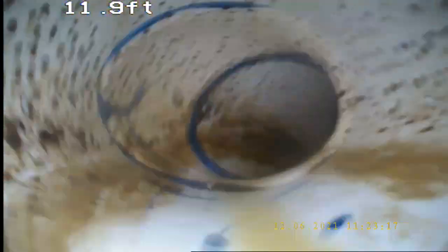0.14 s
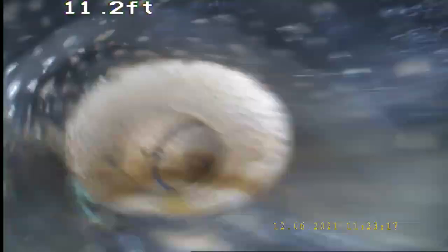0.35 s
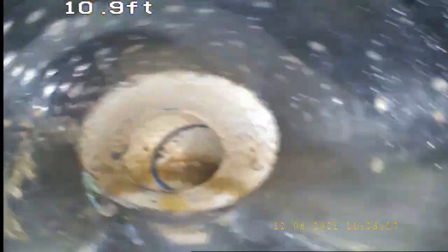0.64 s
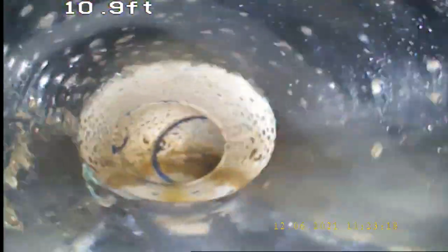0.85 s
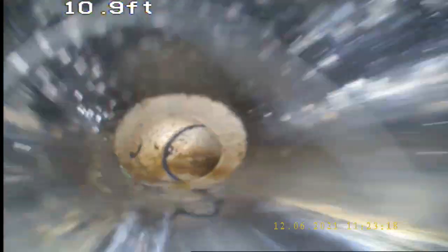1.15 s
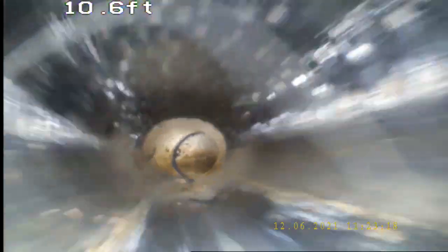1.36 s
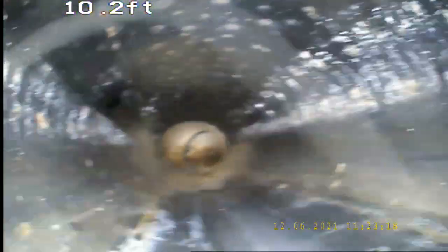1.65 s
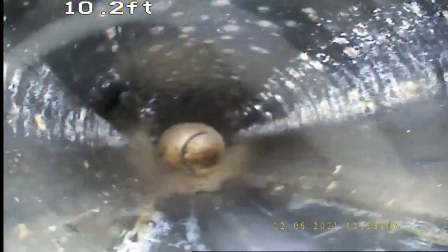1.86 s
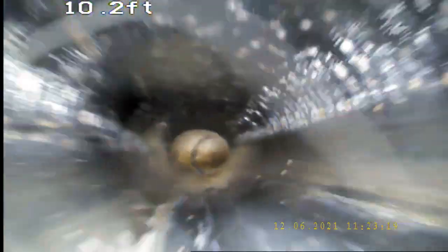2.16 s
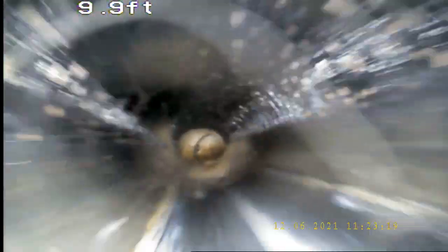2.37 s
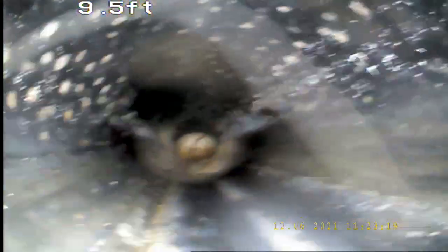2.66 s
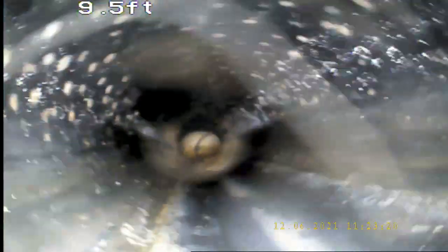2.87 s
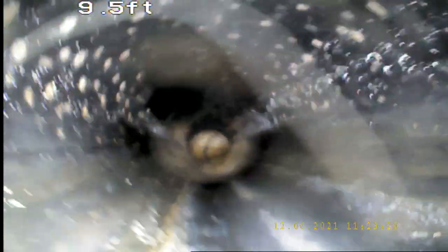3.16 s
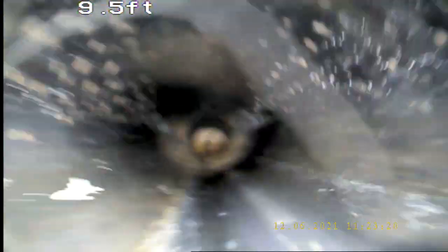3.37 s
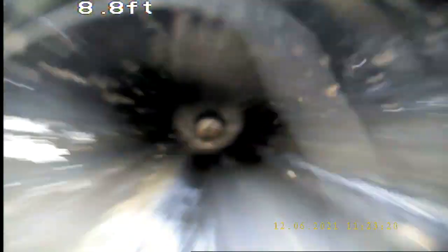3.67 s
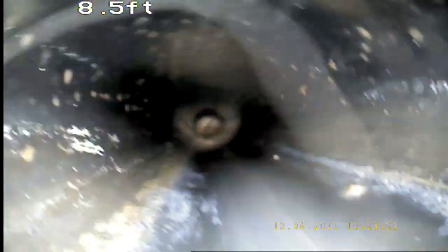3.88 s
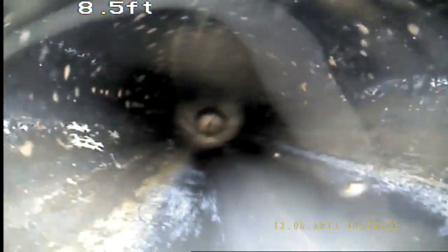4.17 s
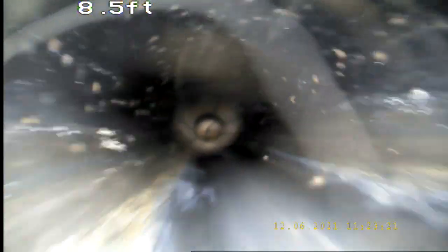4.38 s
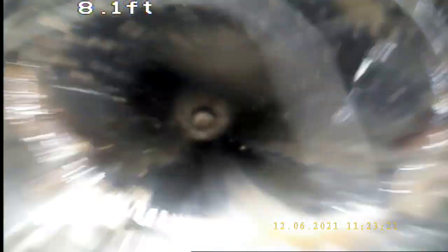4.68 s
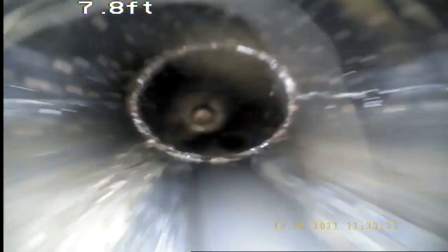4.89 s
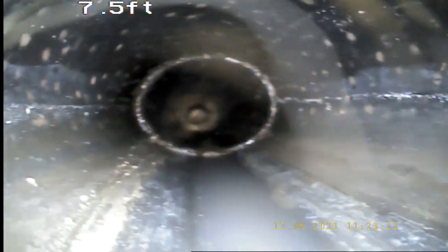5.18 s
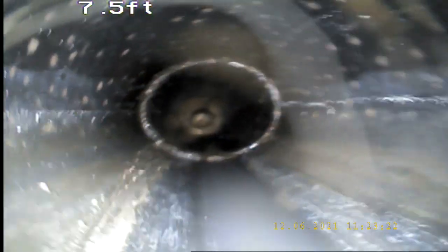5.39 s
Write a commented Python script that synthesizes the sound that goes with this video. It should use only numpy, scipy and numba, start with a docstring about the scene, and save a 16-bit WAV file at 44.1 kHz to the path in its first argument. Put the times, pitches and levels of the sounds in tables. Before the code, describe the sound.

A stiff camera cable is pulled back from a pipe onto a steel reel. A low hum and rumble waver throughout. A hard, overloaded slam rings almost at once, then quieter groaning, scuffs and small ticks follow. Knocks thicken around four seconds before a second clanging slam and a few last knocks. The microphone sits on the reel case, close, dull and narrow-band.

```python
"""A low, wavering hum and rumble come first: a stiff camera cable is wound back out of a pipe onto a steel reel.
The pull keeps two low modes of the frame humming, and the dragging cable groans through gliding noise bands.
The coil rubs once a turn and the cable's skin scuffs its guide: both are uneven noise through resonances.
Knocks, ticks and two slams are short forces that set decaying modes ringing.
A narrow-band recorder, with its microphone on the reel's case, flattens the peaks and spits in overload."""
import sys
import numpy as np
from scipy import signal
from scipy.fft import rfft, irfft, next_fast_len
from scipy.io import wavfile
from scipy.ndimage import uniform_filter1d
from numba import njit

SR = 44100
rng = np.random.default_rng(int(sys.argv[2]) if len(sys.argv) > 2 else 0)


def materialize(psi):
    """Save the field psi as 16-bit PCM at rate SR to the path in sys.argv[1].

    A 1-D psi becomes a single channel; in a 2-D psi each row is a channel.
    """
    bounded = np.clip(np.atleast_2d(psi).T, -1, 1)
    quanta = np.round(bounded * 32767).astype(np.int16)
    wavfile.write(sys.argv[1], SR, quanta)


N = 244314  # length in samples
T = np.arange(N) / SR  # time in s


def undb(db):
    """Turn decibels into a plain gain."""
    return 10 ** (np.asarray(db) / 20)


def unit(x):
    """Scale a signal to an rms of 1."""
    return x / np.sqrt(np.mean(x ** 2))


def walk(rate):
    """Slow random wander: levels held 1 / rate s, then smoothed twice; rms 1."""
    k = int(SR / rate)
    steps = np.repeat(rng.standard_normal(N // k + 1), k)
    smooth = uniform_filter1d(uniform_filter1d(steps, k), k)
    return unit(smooth[:N])


def ring(x, modes):
    """Decaying modes, like struck metal; a unit impulse starts each at its own level."""
    out = 0
    for hz, db, t60 in modes:
        r = np.exp(-np.log(1000) / (t60 * SR))  # shrink per sample: 60 dB down after t60
        w = 2 * np.pi * hz / SR
        mode = signal.lfilter([0, r * np.sin(w)], [1, -2 * r * np.cos(w), r * r], x)
        out = out + undb(db) * mode
    return out


def rasp(peaks, grit_db):
    """Uneven friction grains through broad, steep-sided resonances; rms 1."""
    grains = rng.standard_normal(N) * undb(grit_db * walk(120))
    out = 0
    for hz, width, db in peaks:
        b, a = signal.iirpeak(hz, hz / width, SR)
        band = signal.lfilter(b, a, signal.lfilter(b, a, grains))  # twice, for steep sides
        out = out + undb(db) * unit(band)
    return unit(out)


def blows(s, db, ms, soft_hz, ragged):
    """A sharp first contact, then ragged forces that build and die away; a soft contact holds little treble."""
    size = 4096
    force, k = np.zeros(N + size), np.arange(size)
    chatter = rng.standard_normal((len(s), size))
    for start, gain, length, noise in zip(s, undb(db), np.broadcast_to(ms, len(s)), chatter):
        first = int(start * SR)
        n = max(length, .2) * SR / 1000  # contact time in samples
        push = np.sqrt(k / n) * np.exp(-k / n) / np.sqrt(n)
        force[first:first + size] += gain * ragged * noise * push
        force[first] += gain * .5 * np.sqrt(max(1 - ragged ** 2, 0))
    return signal.sosfilt(signal.butter(2, soft_hz, fs=SR, output="sos"), force[:N])


def swells(steady_db, rows, rise, fall):
    """Gain of a steady level plus swells that rise, hold and fall (slopes in dB per s).

    A swell that peaks after a slam starts no earlier than that slam."""
    power = undb(steady_db) ** 2
    for s, db, hold_ms, *_ in rows:
        start = max([0] + [slam for slam, _ in SLAMS if slam <= s])
        before = np.maximum(s - T, 0)
        after = np.maximum(T - s - hold_ms / 1000, 0)
        power = power + (T >= start) * undb(db - rise * before - fall * after) ** 2
    return np.sqrt(power)


# Steady pull on the cable, a new list after each slam: (t/s, sway level/dB, ring level/dB, drag level/dB)
STEADY_PULL = [
    [(0.0, -27, -23, -34), (0.148, -41.5, -27, -38.5), (0.25, -28, -29, -32)],
    [(0.4, -24.5, -23, -35), (0.63, -46, -25, -51), (1.02, -25.5, -32.5, -43.5), (1.34, -35, -23, -41),
     (1.8, -38.5, -42.5, -39.5), (1.93, -38, -45, -46.5), (2.52, -29.5, -30, -40), (2.92, -44, -46, -49.5),
     (3.25, -34.5, -45.5, -45), (3.65, -28.5, -27.5, -35), (4.1, -37, -37.5, -42.5), (4.41, -29, -39, -34),
     (4.63, -25, -35.5, -33.5)],
    [(4.79, -23.5, -26, -30.5), (4.92, -35.5, -20.5, -36.5), (5.042, -39, -21, -39.5),
     (5.17, -33.5, -28.5, -45), (5.294, -36.5, -36, -35), (5.54, -29.5, -31, -35)],
]


def pull_levels():
    """Steady sway, ring and drag levels in dB, joined by straight lines; a slam jumps to the next list."""
    rows = []
    for table, after in zip(STEADY_PULL, STEADY_PULL[1:]):
        hold = (after[0][0] - .004, *table[-1][1:])  # the last row holds until 4 ms before the next list
        rows += [*table, hold]
    s, *columns = np.transpose(rows + list(STEADY_PULL[-1]))
    return [np.interp(T, s, column) for column in columns]


# Jolts swell the frame's ring mode: (peak t/s, level/dB, hold/ms)
RING_JOLTS = [(0.019, -24.5, 30), (.22, -24.5, 5), (0.267, -2, 5.3), (0.307, -2.5, 33), (1.06, -19.5, 15),
              (1.29, -21, 10), (1.45, -25.5, 90), (1.71, -34.5, 10), (1.85, -43, 5), (2.06, -29, 10),
              (2.25, -30, 5), (2.429, -24, 17), (2.52, -27, 10), (2.66, -27, 60), (3.401, -23, 3.3),
              (3.506, -11.5, 10), (3.7, -21, 50), (3.79, -19.5, 9.6), (4.051, -21.5, 10), (4.18, -34, 10),
              (4.3, -36.5, 10), (4.46, -25.5, 5), (4.55, -22.5, 20), (4.659, -3.5, 16), (4.741, -4, 5),
              (4.836, -17.5, 30), (5.237, -18, 5), (5.306, -24, 5), (5.466, -13.5, 5)]
RING_HZ, RING_WANDER_HZ = 168.5, 4
SETTLE_S, SETTLE_SHARE = .6, .85  # after a slam the ring mode rings freely and wavers less


def frame_ring():
    """The frame's upper hum: a wavering mode kept going by the pull, swelling with each jolt."""
    settled = sum((T > s) * np.exp(-((T - s) / SETTLE_S) ** 4) for s, _ in SLAMS)
    loose = 1 - SETTLE_SHARE * settled
    pitch = RING_HZ + RING_WANDER_HZ * loose * walk(25)
    hum = np.sin(2 * np.pi * np.cumsum(pitch) / SR) * undb(3.1 * loose * walk(25))
    return np.sqrt(2) * hum * swells(pull_levels()[1], RING_JOLTS, rise=650, fall=540)


# The frame lurches in its sway mode: (peak t/s, level/dB, hold/ms)
SWAY_LURCHES = [(.094, -16.5, 5), (.164, -18.5, 5.5), (.31, -20, 65), (1.03, -27, 9.7), (1.29, -18.5, 9.3),
                (1.43, -20, 10), (1.62, -37, 8), (2.099, -21, 3), (2.225, -19, 24), (2.39, -24, 5),
                (2.46, -27.5, 20), (2.655, -19.5, 42), (2.744, -31, 3), (3.24, -26, 37), (3.56, -23.5, 32),
                (3.73, -19.5, 24), (3.84, -26, 16), (4.027, -7.5, 9.1), (4.065, -16.5, 4.5),
                (4.316, -6.5, 12), (4.37, -20.5, 20), (4.49, -21.5, 20), (4.711, -7, 12), (5.236, -18, 55),
                (5.436, -7, 13.5)]
SWAY_HZ, SWAY_WANDER_HZ = 101.06, 6


def frame_sway():
    """The frame's lower hum: a wavering mode kept going by the pull, swelling with each lurch."""
    pitch = SWAY_HZ + SWAY_WANDER_HZ * walk(30)
    sway = np.sin(2 * np.pi * np.cumsum(pitch) / SR) * undb(1.4 * walk(40))
    return np.sqrt(2) * sway * swells(pull_levels()[0], SWAY_LURCHES, rise=920, fall=420)


# Shape of the steady background, before its overall level is set: (f/Hz, relative level/dB)
FLOOR_SHAPE = [(12, -42.5), (20, -8.5), (37, -14), (75, -4.5), (96, 1), (179, -5), (224, -12), (448, -29),
               (671, -37.5), (1030, -35), (1640, -41.5), (2870, -46.5), (3590, -51.5), (4200, -62.5),
               (5460, -100), (9240, -120)]
FLOOR_DB = -29.5


def background():
    """Steady rumble and hiss: random noise shaped by frequency."""
    size = next_fast_len(N)
    hz = np.fft.rfftfreq(size, 1 / SR) + 1  # 1 Hz up, so the logarithm exists
    shape_hz, shape_db = np.transpose(FLOOR_SHAPE)
    shape = undb(np.interp(np.log(hz), np.log(shape_hz), shape_db))
    noise = irfft(rfft(rng.standard_normal(size)) * shape, size)[:N]
    return unit(noise) * undb(FLOOR_DB)


# The cable catches and the drag surges: (peak t/s, level/dB, hold/ms, groan f/Hz)
DRAG_SURGES = [(0.075, -49, 5, 392), (.27, -15.5, 16, 440), (0.641, -53, 10, 432), (.8, -34, 13, 420),
               (0.971, -37, 2.15, 391), (1.139, -30.5, 20, 458), (1.28, -37, 87, 460),
               (1.603, -28.5, 10, 472), (1.705, -26, 20, 380.4), (1.8, -40, 92, 450), (2.09, -35, 5, 463),
               (2.22, -28.5, 3.2, 393), (2.276, -30, 35, 334), (2.331, -27.5, 15, 339),
               (2.45, -40, 10, 450.3), (2.65, -29, 14, 500), (2.87, -36.5, 20, 349),
               (3.14, -42.5, 7.9, 408), (3.24, -37, 5.9, 498), (3.361, -36.5, 2.7, 453),
               (3.511, -34.5, 33, 369), (3.669, -28, 14.5, 451), (3.82, -42, 30, 433),
               (4.01, -30.5, 8.8, 321), (4.18, -31, 10, 440), (4.29, -27, 39, 362), (4.49, -27, 17, 452),
               (4.651, -3.5, 3.9, 491), (5.186, -23, 70, 424.3), (5.291, -23, 10, 408.6),
               (5.416, -19.5, 33, 360)]
# Fixed resonances of the drag: (f/Hz, width/Hz of each filter pass, relative level/dB)
DRAG_BANDS = [(217, 17, -8.5), (326, 120, 7), (465.4, 87, 9), (480.5, 18, 2)]
GROAN_WIDTH_HZ = 65.  # of each filter pass
GROAN_DB, GROAN_DB_PER_MS = -1.5, 0.11  # level at no hold; a surge that holds longer groans more


def drag():
    """The cable drags over the frame: fixed bands, and a groan that moves with the free length of cable."""
    s, _, hold_ms, groan_hz = np.transpose(DRAG_SURGES)
    hz = np.interp(T, s, groan_hz)
    once = sweep(rng.standard_normal(N), hz, GROAN_WIDTH_HZ)
    groan = unit(sweep(once, hz, GROAN_WIDTH_HZ))
    groan = groan * undb(GROAN_DB + GROAN_DB_PER_MS * np.interp(T, s, hold_ms))
    grind = unit(rasp(DRAG_BANDS, 2.9) + groan)
    return grind * swells(pull_levels()[2], DRAG_SURGES, rise=440, fall=680)


@njit
def sweep(x, hz, width):
    """Band-pass whose centre moves: two memories trade energy like a spring and a mass."""
    y, band, low = np.empty(len(x)), 0., 0.
    for i in range(len(x)):
        g, k = np.tan(np.pi * hz[i] / SR), width / hz[i]
        v = (band + g * (x[i] - low)) / (1 + g * (g + k))
        band = 2 * v - band
        low = low + 2 * g * v
        y[i] = k * v
    return y


# The coil rubs its cage once a turn: (start t/s, end t/s, level/dB at the start, level/dB at the end)
RUBS = [(-.1, 0.4, -53, -33.5), (1.002, 1.529, -42, -41.5), (2.073, 2.617, -43.5, -42),
        (3.205, 3.804, -48, -39.5), (4.391, 4.948, -43.5, -41)]
# Resonances of the rub: (f/Hz, width/Hz of each filter pass, relative level/dB)
COIL_BANDS = [(756, 56, -8.5), (1096, 63, -5.5), (1252, 30, -6), (1425, 24, -3), (1566, 13, -2.5),
              (1534.5, 73, 3), (1595, 100, -8), (1864, 25, -13.5)]
RUB_RISE_S, RUB_FADE_S = .3, 0.33


def coil_rub():
    """The coil rubs its cage for about half of each turn: uneven friction through the coil's resonances."""
    gain = 0
    for start, end, first_db, last_db in RUBS:
        # half way through the ramps at the start and the end
        ramps = np.minimum((T - start) / RUB_RISE_S, (end - T) / RUB_FADE_S) + .5
        touch = np.clip(ramps, 0, 1) ** 2
        gain = gain + touch * undb(np.interp(T, [start, end], [first_db, last_db]))
    return gain * rasp(COIL_BANDS, 2.2) * undb(2.2 * walk(14))


BUZZ_HZ, BUZZ_DB = 25, -66  # ticks per second; level before the gate cuts it into ticks


def buzz():
    """Faint electrical ticking: treble noise let through in regular short bursts."""
    cycle = (T - .03) * BUZZ_HZ % 1
    gate = np.exp(-cycle / 0.022)
    return undb(BUZZ_DB) * gate * rasp([(2600, 2500, 0)], 1.5)


# Sharp ticks: (t/s, tick level/dB, bright part level/dB)
SHARP_TICKS = [(0.256, -20, -20), (0.26, -5, -10), (0.276, -2.5, -21), (0.776, -32, -43),
               (1.805, -44, -61.5), (2.082, -30.5, -50.5), (2.297, -28.5, -43), (2.32, -31, -46),
               (2.45, -32.5, -46), (2.651, -33.5, -53), (2.859, -38.5, -60), (3.132, -55, -58),
               (3.234, -37, -58), (3.818, -29.5, -45.5), (3.826, -30.5, -53), (3.862, -29, -55),
               (3.886, -26, -41), (3.906, -27, -48), (4.021, -20, -50), (4.101, -28.5, -52),
               (4.141, -32, -31.5), (4.179, -35, -53), (4.287, -43.5, -36), (4.304, -25, -48),
               (4.321, -38, -47), (4.344, -26, -46), (4.36, -31.5, -55), (4.441, -33.5, -44),
               (4.638, -16.5, -8.5), (4.694, -18, -26), (4.72, -16.5, -27.5), (4.765, -26.5, -35.5),
               (5.026, -34.5, -70), (5.194, -31.5, -39.5), (5.391, -36.5, -47), (5.42, -19, -37.5),
               (5.43, -16, -45), (5.448, -17.5, -31.5), (5.469, -26.5, -45.5), (5.486, -20, -37.5),
               (5.51, -33.5, -57.5)]
# Modes of the tick and of its bright part: (f/Hz, level/dB, time to fall 60 dB/s)
TICK_MODES = [(1040, 3, 0.034), (1230, -1, 0.025), (1377, -8, 0.021), (1570, -7, .03)]
BRIGHT_MODES = [(2003, 5, 0.03), (2350, 2, .015), (2700, 3, 0.015), (3250, 2, 0.015)]


def ticks():
    """Ticks: short, hard contacts ring the high modes."""
    s, tick_db, bright_db = np.transpose(SHARP_TICKS)
    body = ring(blows(s, tick_db, 2.9, 2800, .8), TICK_MODES)
    bright = ring(blows(s, bright_db, 3.0, 4800, .85), BRIGHT_MODES)
    return body + bright


# Cable knocks on the frame: (t/s, knock level/dB, thump level/dB, contact/ms)
CABLE_KNOCKS = [(0.261, 2.5, -15.5, 3), (0.271, -19, -3, 9), (0.289, -14, 8, 6.9), (0.955, -51, -31, 9.1),
                (1.598, -28, -31, 6.6), (1.7, -22.5, -25.5, 4), (1.804, -27.5, -35, 4.6),
                (2.084, -26, -28, 6), (2.268, -26, -37, 5), (2.297, -20, -36.5, 5), (2.332, -28.5, -30, 4),
                (2.449, -30.5, -21, 3), (2.651, -22, -14, 3), (2.853, -32.5, -33, 2.45),
                (3.135, -35, -42, 4.4), (3.242, -24, -20.5, 10.6), (3.779, -37, -16, 9.6),
                (3.82, -17.5, -8, 4.5), (4.004, -21.5, -4, 3), (4.143, -27, -12.5, 3), (4.291, -22, 0, 3),
                (4.641, 6, 6.5, 3.7), (4.657, -9.5, -20.5, 7.6), (4.69, -17, -10, 5.4),
                (4.72, -30, -2, 6.9), (4.764, -21, -6.5, 4), (5.289, -24, -22, 4.5), (5.419, -17, 0, 4.8)]
# Low and middle modes of the frame: (f/Hz, level/dB, time to fall 60 dB/s)
THUMP_MODES = [(104, -5, 0.2), (135.5, -4, 0.15), (185, -6, 0.09), (215, -4, 0.07), (250, -5, 0.06)]
KNOCK_MODES = [(321.5, -8, 0.38), (375, -6, 0.058), (456, 0, 0.15), (519.4, -0.5, 0.15),
               (528, -15.5, 0.049), (667.4, -12, 0.037)]


def knocks():
    """The cable knocks on the frame: softer contacts ring the low and middle modes."""
    s, knock_db, thump_db, ms = np.transpose(CABLE_KNOCKS)
    low = ring(blows(s, thump_db, ms, 390, 0.54), THUMP_MODES)
    # the thumps carry no deep bass
    low = signal.sosfilt(signal.butter(2, 65, "high", fs=SR, output="sos"), low)
    middle = ring(blows(s, knock_db, ms, 600, .65), KNOCK_MODES)
    return low + middle


# The two slams: (t/s, level/dB of the long ring)
SLAMS = [(.262, -9.5), (4.642, -13)]
# Long modes that a slam sets ringing: (f/Hz, level/dB, time to fall 60 dB/s)
SLAM_MODES = [(258, -7, .5), (312, -3, .4), (449, -6, .9), (453.5, -5, .8), (522, -4, .75), (576, -9, .45),
              (775, -24, .6), (985, -17, 1.3), (997, -27, .8), (1093, -17, .75), (1184, -17, .75),
              (1206, -15, .65), (1432, -14, .5), (1986, -32, .9)]


def slam_tails():
    """Each slam sets long modes ringing, and their level wavers."""
    s, db = np.transpose(SLAMS)
    return ring(blows(s, db, 17.0, 2800, 0.35), SLAM_MODES) * undb(2.6 * walk(40))


# The cable's skin scuffs the guide: (start t/s, rise/ms, fade/ms, low level/dB, high level/dB)
SKIN_SCUFFS = [(.53, 34, 42, -58, -49), (.755, 52, 42, -38.5, -38), (1.26, 16, 44, -46, -52.5),
               (1.70, 15.6, 55, -48.5, -66.5), (1.80, 18.5, 72, -46, -70), (2.08, 9.7, 160, -46, -65),
               (2.261, 47, 43, -32, -52), (2.58, 21, 34, -43.5, -46.5), (2.645, 7.6, 28, -37.5, -68),
               (2.851, 16, 47, -47.5, -67), (3.14, 14, 47, -54, -58.5), (3.379, 31, 180, -43.5, -48.5),
               (3.80, 34, 410, -52, -62), (4.281, 17, 30, -36, -57), (5.411, 13.5, 114, -43.5, -49.5),
               (4.679, 7.7, 100, -28.5, -47.5), (5.168, 39, 37, -38.5, -55.5), (5.31, 24, 19, -62, -54.5),
               (0.277, 8.7, 74, -27, -45)]
# Low and high resonances of a scuff: (f/Hz, width/Hz of each filter pass, relative level/dB)
LOW_BANDS = [(770, 230, -6.5), (1126, 360, 2), (1366, 230, -9)]
HIGH_BANDS = [(2030, 320, 1), (2838, 590, -3), (3210, 380, -4.5)]


def scuffs():
    """The cable's skin scuffs the guide: low and high friction noise swells, then fades."""
    low, high = 0, 0
    for s, rise, fade, low_db, high_db in SKIN_SCUFFS:
        since = (T - s) * 1000  # ms
        swell = np.clip(since / rise, 0, 1) * np.exp(-np.maximum(since - rise, 0) / fade)
        low = low + undb(low_db) * swell
        high = high + undb(high_db) * swell
    return low * rasp(LOW_BANDS, 0.47) + high * rasp(HIGH_BANDS, 2.4)


def scene():
    """Everything at the reel, added together as one channel."""
    steady = frame_ring() + frame_sway() + background() + buzz()
    cable = drag() + coil_rub() + scuffs()
    hits = ticks() + knocks() + slam_tails()
    return (steady + cable + hits)[None]


# Spits in overload: (t/s, number of flips to the lower rail)
SPIT_BURSTS = [(.2682, 1), (.2719, 2), (.2727, 1), (.2729, 2), (.2744, 2), (.2895, 2), (.2907, 1),
               (.304, 2), (.3155, 2), (4.6418, 2), (4.6438, 2), (4.6451, 2), (4.6463, 2), (4.6519, 3),
               (4.6584, 1), (4.6592, 3), (4.6609, 1), (4.6697, 4), (4.6769, 1)]
SPIT_HZ, SPIT_DEPTH = 3660, 0.7  # flips per second, and how far down they go
FULL_LOW, FULL_HIGH, RAIL = -.7, .74, .755  # input limits, and the limit after the narrow band
BAND_HZ, TOP_HZ = 3980, 15800
HISS_DB = -101


def record(dry):
    """Peaks flatten and, in overload, flip to the lower rail; a narrow band follows, whose overshoot clips."""
    x = dry.clip(FULL_LOW, FULL_HIGH)
    for s, flips in SPIT_BURSTS:
        first = int((s - .5 / SPIT_HZ) * SR)
        last = int((s + (flips + 1.2) / SPIT_HZ) * SR)
        cycle = (T[first:last] - s) * SPIT_HZ
        down = (cycle % 1 < .42) & (cycle > 0) & (cycle < flips)
        x[:, first:last] = np.where(down, -SPIT_DEPTH, FULL_HIGH)
    x = signal.sosfiltfilt(signal.cheby1(6, .3, BAND_HZ, fs=SR, output="sos"), x)
    x = x.clip(-RAIL, RAIL) + undb(HISS_DB) * rng.standard_normal(N)
    return signal.sosfilt(signal.ellip(8, .2, 60, TOP_HZ, fs=SR, output="sos"), x)


dry = scene()
out = record(dry)
materialize(out)
```